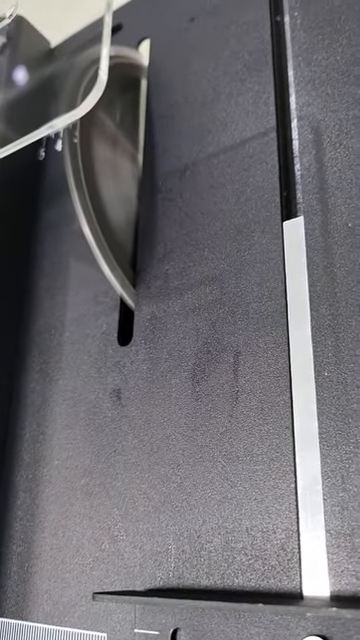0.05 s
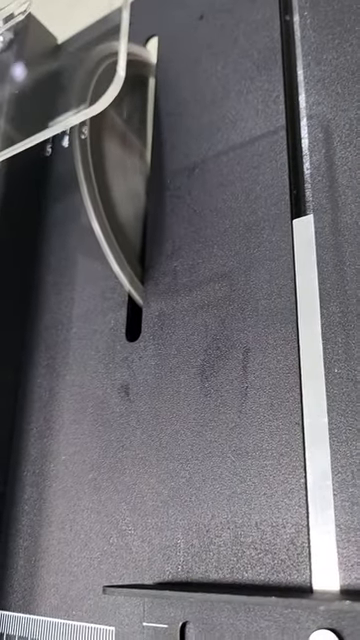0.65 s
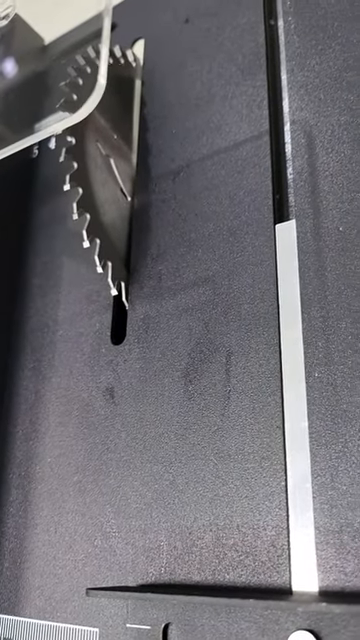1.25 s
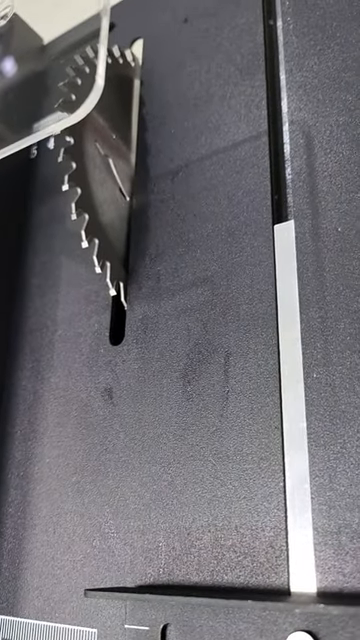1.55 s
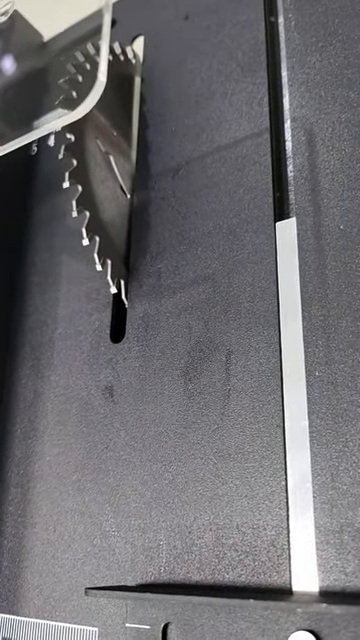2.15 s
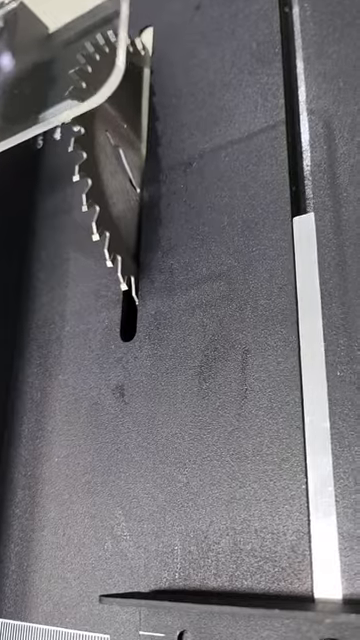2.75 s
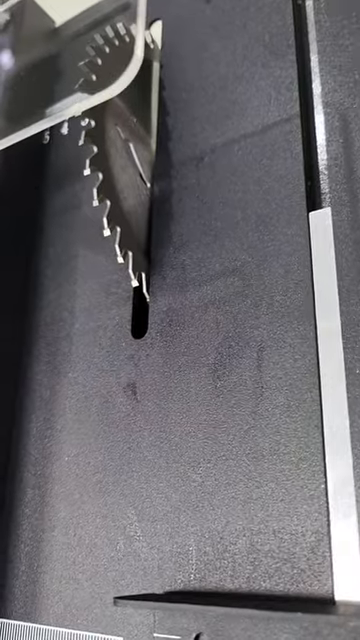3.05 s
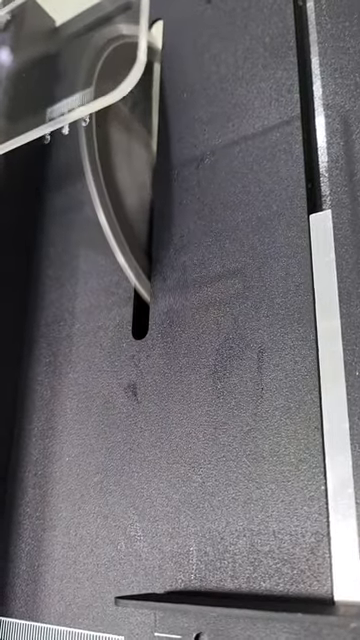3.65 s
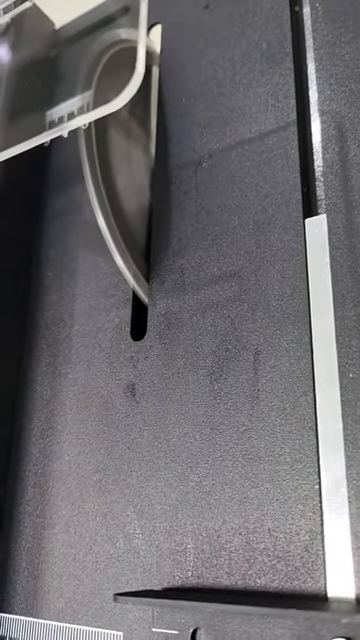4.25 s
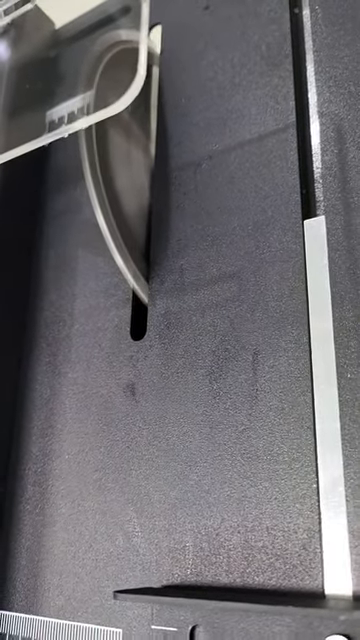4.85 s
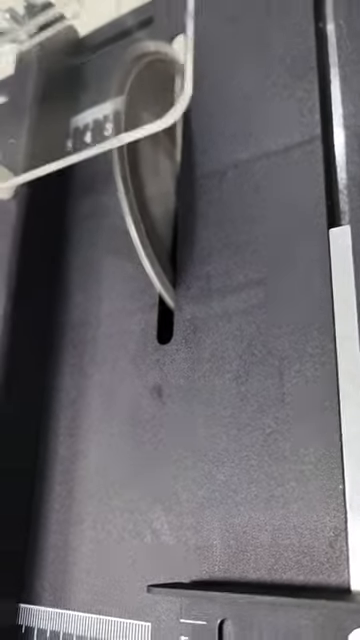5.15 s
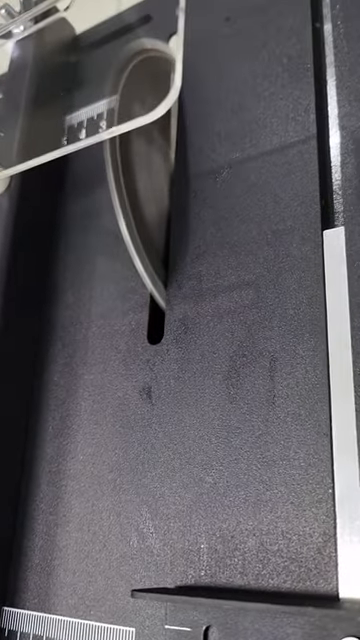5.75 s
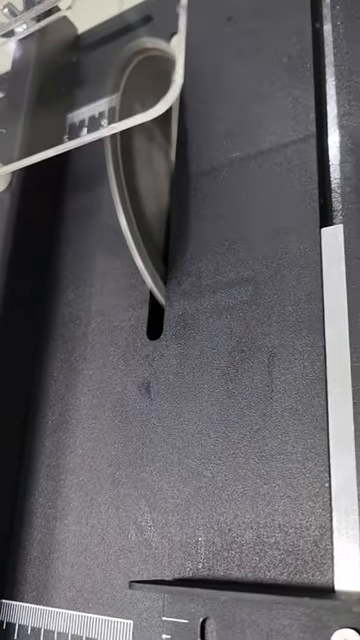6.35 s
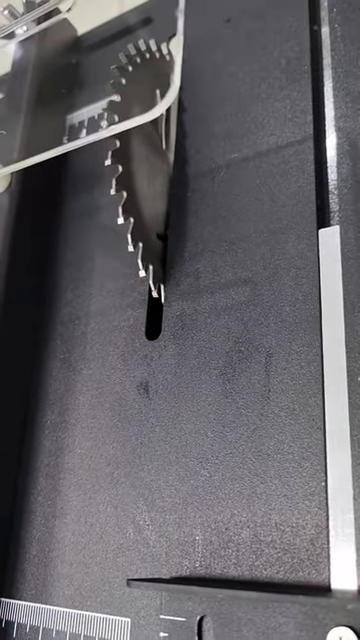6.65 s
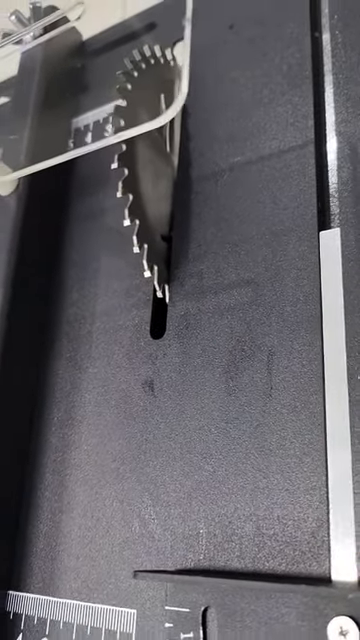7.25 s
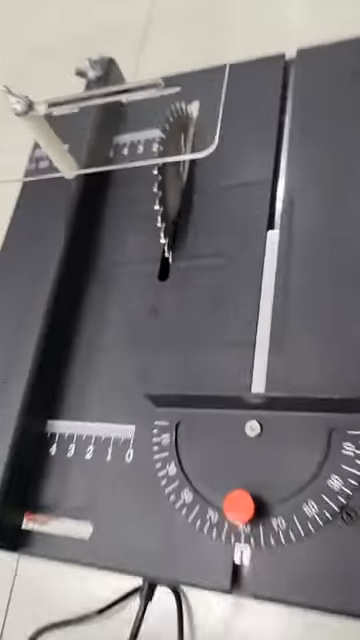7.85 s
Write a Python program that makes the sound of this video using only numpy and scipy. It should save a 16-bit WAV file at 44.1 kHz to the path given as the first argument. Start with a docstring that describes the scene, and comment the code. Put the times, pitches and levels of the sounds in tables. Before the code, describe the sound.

Close by and slightly right, a small table saw idles with a pulsing belt whine and rattle, until a rocker switch snaps and the pitch slides down to a stop. A low workshop hum and a few faint taps fill the gap. The switch clicks again, the housing knocks and the motor jumps back to speed. A last snap brings another falling whine, a faint blade ring and a soft rustle of cloth, with slight room echo.

```python
"""In a workshop, a small table saw runs idle, is switched off, coasts to rest, starts and stops again.
Its belt teeth whine on the pulley and throb with every lap of the belt, and the bearings rattle.
As the saw slows, the falling whine sweeps through the notes at which the housing likes to ring.
A rocker switch snaps and sparks, the housing knocks, and the blade rings on faintly after each stop.
A sleeve rustles at the end, and a low hum goes on throughout."""
import sys
import numpy as np
from scipy import signal
from scipy.fft import rfft, irfft, next_fast_len
from scipy.io import wavfile

SR = 44100
rng = np.random.default_rng(int(sys.argv[2]) if len(sys.argv) > 2 else 0)


def dump(signal):
    """Clip the signal to [-1, 1] and save it as 16-bit WAV at the path in sys.argv[1]."""
    limited = np.clip(np.atleast_2d(signal).T, -1, 1)
    pcm = np.round(limited * 32767).astype(np.int16)
    wavfile.write(sys.argv[1], SR, pcm)


N = 357651
TIME = np.arange(N) / SR
TURNS_PER_S, PULLEY_TEETH, BELT_TEETH = 53.83, 16, 175

# Levels are relative. Ring time is the time to fade by 60 dB. A larger tilt sounds brighter.
# motor runs: on t/s, off t/s, start of one belt lap t/s, whine level under load/dB
MOTOR_RUNS = [(-0.5, 0.812, .174, -2), (3.498, 6.507, 5.126, -0.5)]
# how tight the belt is along one lap: share of the lap, tension from -1 to 1
BELT_TENSION = [(.01, 1), (.13, .95), (.24, -.9), (.42, -.55), (.58, .3), (.71, -.95), (.86, -.45),
                (.93, .7)]
# tones of the whine: cycles per shaft turn, level/dB, left minus right/dB, swell per unit tension/dB
WHINE_TONES = [(8, -47, -6.5, 2), (15, -41.5, -8, -3.5), (16, -26.4, -6, 3.3), (32, -35.3, -10, 11),
               (33, -38.5, -9, 6.5), (48, -44, -9, 1.5), (17, -47, -10, 3), (18, -40, 2.5, 0.5),
               (19, -48, 3.5, 7), (20, -50, -4.5, 3), (30, -54, -8, 10), (31, -49, -3, 5),
               (34, -53, -15, 7), (42, -58, -0.5, 1), (45, -59, -9, 3), (57, -49, -11.5, -1),
               (58, -51.5, -5.5, 2), (46, -57, -5, 2), (47, -57, -6, 2), (49, -57, -6, 2), (50, -56, -5, 2),
               (56, -58, -6, 1), (80, -73, -2, 1), (87, -72, -2, 1), (91, -69, -2, 1), (99, -72, -2, 1),
               (100, -71, -2, 1), (112, -67, -1, 1), (118, -67, -1, 1), (119, -69, -1, 1)]
# tones that build up in the frame and so swell late: cycles per shaft turn
LATE_TONES = (16, 17, 18, 19, 20, 33, 34)
# the main tone dips as the teeth float free: t/s after power off, level/dB
TEETH_LET_GO = [(.008, -2), (.022, -15.5), (.04, -9), (.06, -2.5)]
# how well the frame passes on a tone: f/Hz, level/dB
FRAME_RESPONSE = [(110, -43), (175, -24.5), (260, -35.5), (350, -2), (385, -10), (415, -5.5), (480, -20.5),
                  (560, 3.5), (680, -6), (790, -19), (850, 1), (1100, 4.5), (1230, -5), (1360, 3.5),
                  (1500, -2.5), (1620, 1)]
# rattle of bearings, brushes and belt: f/Hz, level/dB
RATTLE_COLOUR = [(100, -12.5), (175, -8.5), (280, -22.5), (340, -5.5), (480, -14), (680, 0.5), (780, -21.5),
                 (1050, 7), (1200, -9), (2000, -9), (2600, -9), (3400, -17), (4300, -25), (6600, -24),
                 (8800, -37), (15000, -42)]
# notes at which the housing rings: f/Hz, width/Hz, level/dB
HOUSING_RINGS = [(329, 5.5, 7.5), (358.4, 22, 16.5), (405.9, 17, 23), (559.6, 21, 12.5), (655.7, 16, 11),
                 (1041, 24, 3), (179, 27, 14.5)]
# long rings of blade and table: f/Hz, ring time/s, level/dB
BLADE_RINGS = [(382, 3.0, -10), (829, 2.3, -9), (368, .6, 0), (414, .65, 2), (565, .6, -19), (1023, .8, -3),
               (1507, .5, -13), (1960, .4, -3)]
# notes of the loose panels: f/Hz, width/Hz, level/dB
PANEL_RINGS = [(665, 13, -0.5), (830, 17, -6.5), (1004, 18, 0), (1304, 46, -6)]
# a soft swell of noise just before each snap: t/s, level/dB, ring time/s, tilt/dB per octave
SNAP_LEAD_INS = [(.807, -18.5, 0.15, 4), (3.475, -24, .1, -1.5), (6.546, -22, 0.087, 1)]
# the switch snaps home and bounces: t/s, level/dB, ring time/s, tilt/dB per octave
SWITCH_SNAPS = [(.8228, -14.5, 0.045, -2), (.83, -24.5, .05, -2.5), (3.4855, -14.5, 0.012, 2),
                (3.489, -23.5, 0.18, 0), (6.5553, -16.5, 0.065, -1), (6.561, -14.5, .04, -1.5)]
# tone colour of the switch: f/Hz, level/dB
SNAP_COLOUR = [(150, -30), (260, -11), (350, 1), (550, -2.5), (800, 7), (1500, 3.5), (2500, 3.5),
               (3700, -1), (5000, -13), (6300, -10.5), (7800, -18.5), (11000, -29), (15000, -24.5)]
# notes of the panel around the switch: f/Hz, width/Hz, level/dB
SNAP_RINGS = [(1450, 290, -5.5), (1964, 83, -8.5), (2290, 180, -4), (2850, 240, -7.5), (4130, 770, -11)]
# a faint high hiss into the first snap, then three sparks: t/s, level/dB, ring time/s, tilt/dB per octave
HISS_AND_SPARKS = [(.81, -33, 0.21, 1.5), (.8228, -25, .07, 0.5), (3.4855, -33.5, 0.026, 3.5),
                   (6.554, -28, .1, -1)]
# tone colour of that hiss and the sparks: f/Hz, level/dB
HISS_AND_SPARK_COLOUR = [(1000, -39.5), (5000, -16.5), (6300, 8), (7600, -4), (11000, -6.5), (14800, 2.5)]
# the motor takes up or drops its load, or a hand bumps the housing: t/s, level/dB, top f/Hz
HOUSING_KNOCKS = [(.826, -22, 440), (2.6, -49.5, 400), (2.744, -50, 400), (3.511, -25, 800),
                  (3.5246, -13, 850), (3.535, -20.5, 800), (3.548, -23, 800), (3.56, -27.5, 800),
                  (3.573, -23.5, 800), (6.577, -25.5, 500)]
# notes of a knock: f/Hz, ring time/s, level/dB
KNOCK_RINGS = [(381, 0.087, -10), (425, .075, 0.5), (558, .1, -0.5), (675, 0.018, -3.5)]
# the blade comes to rest: t/s, level/dB of its ring
BLADE_STOPS = [(1.058, -56), (6.755, -47)]
# two close notes of the shuddering stand: f/Hz, ring time/s, level/dB
STAND_RINGS = [(378, .55, -28.5), (413, .55, -31)]
# faint taps of a hand: t/s, level/dB, ring time/s, tilt/dB per octave
HAND_TAPS = [(2.592, -62, .09, 0.5), (2.704, -58, 0.15, 2), (2.731, -57, .08, -0.5), (2.764, -55, .07, -3),
             (2.822, -64, 0.047, -1), (3.04, -52, .025, 2)]
# tone colour of a tap: f/Hz, level/dB
HAND_COLOUR = [(200, -8.5), (420, 14), (850, -5.5), (1300, 6.5), (1650, 6), (1950, -9), (2280, 4.5),
               (3000, -10.5), (4500, -23), (7000, -17), (9000, -38), (15000, -41.5)]
# loudness of the sleeve: t/s, level/dB
CLOTH_LEVEL = [(7.5, -78), (7.616, -59.5), (7.778, -51), (7.812, -62.5), (7.89, -63), (7.99, -61.5),
               (8.11, -54.5)]
# tone colour of the sleeve: f/Hz, level/dB
CLOTH_COLOUR = [(290, -17.5), (500, -13), (619, -16), (1370, -12.5), (2390, -13.5), (2800, -11.5),
                (4290, -23), (6030, -17.5), (8610, -34), (15000, -46)]
# bright notes of the casing: f/Hz, width/Hz, level/dB
CASING_RINGS = [(2350, 110, -10), (2620, 180, -4.5), (3020, 35, -2), (3400, 190, -5), (6060, 50, 8.5),
                (6330, 79, 4.5), (6900, 110, 1), (8720, 180, 3.5), (13200, 180, -3), (14750, 300, -3)]
# the saw stands to the right: f/Hz, left minus right level/dB
LEFT_LEVEL = [(120, 8.5), (400, -7), (700, -10), (1050, -4.5), (1700, -6.5), (3000, -2), (5000, -4),
              (7000, 0)]
# how far the wave on the left trails behind: f/Hz, lag/radians
LEFT_LAG = [(120, 1.7), (400, 0.97), (700, 1.5), (870, 0.69), (1000, 3.16), (1400, 3.6), (1750, 0.83),
            (2200, 4.1), (2800, 2.7), (3900, 1.66), (4700, 1.2), (6000, 0.23), (9000, 0.9)]
# how long the room echoes: f/Hz, ring time/s
ROOM_RING_TIME = [(200, 1), (450, 0.65), (1000, 0.68), (2000, .72), (3300, 0.75), (7000, 0.13),
                  (15000, 0.16)]
# how much of the small sounds spreads into the room: f/Hz, level/dB
SMALL_ECHO_COLOUR = [(1000, 0), (2000, 1), (2700, -1.5), (3700, -6.5), (6000, -2.5), (12000, -2)]
# tones of the steady hum: f/Hz, level/dB
HUM_TONES = [(58.6, -42), (121.8, -72), (125, -74), (242, -74), (414.5, -85)]
# room air and faint hiss: f/Hz, level/dB in a band 1 Hz wide
AIR_COLOUR = [(25, -84.5), (40, -86.5), (80, -85.5), (100, -83.5), (125, -85), (160, -96.5), (240, -101),
              (320, -103), (500, -107), (1000, -113), (2000, -120.5), (5000, -127), (6400, -124),
              (7000, -117), (8200, -134), (14000, -129)]


def saw(rattle_db=-37, rattle_growth=1.9, scatter_db=-12, bass_cut_hz=300):
    """Whine and rattle grow with speed and ring housing and blade. Returns the whole, and the rattle."""
    speed, pull, laps, whine_db = motor()
    turns, tension = shaft(speed, laps)
    tones = belt_whine(turns, speed, tension * speed ** 2, pull) * from_db(whine_db) * np.sqrt(speed)
    shake = from_db(rattle_db) * speed ** rattle_growth
    direct, scattered = (from_right(rattle(turns, tension) * shake) for _ in range(2))
    rattling = direct + from_db(scatter_db) * scattered * [[1], [-1]]
    drive = tones + band_filter(rattling, 5, bass_cut_hz, "high")   # a small body gives little bass
    housing = ring_through(drive, HOUSING_RINGS)
    blade = ring_through(drive, [(hz, np.log(1000) / np.pi / ring_s, db) for hz, ring_s, db in BLADE_RINGS])
    return drive + housing + blade + panel_buzz(housing[1]), rattling


def motor(spin_up_s=.024, coast_s=.41, brake_s=.065, seat_s=.125, slack_s=.034,
          judder_hz=85, judder_db=18, bed_in_db=2, bed_in_s=1.7):
    """The motor speeds up fast and friction stops it. Returns speed, belt pull, laps and whine level."""
    speed, pull, laps, level_db = np.zeros((4, N))
    for on, off, lap_start, load_db in MOTOR_RUNS:
        now = TIME >= on
        age, coasting = np.maximum(TIME - on, 0), np.maximum(TIME - off, 0)
        braking = np.minimum(coasting / brake_s, 1) ** 2   # takes hold gradually
        run_speed = (1 - np.exp(-age / spin_up_s)) * np.maximum(1 - braking * coasting / coast_s, 0)
        seated = np.minimum(age / seat_s, 1)
        taut = np.clip(2 - coasting / slack_s, 0, 1)
        # the motor judders until the belt is seated; the whine then grows as the belt beds in
        judder_dip_db = judder_db * (1 - seated) * np.cos(np.pi * judder_hz * age) ** 2
        bedding_dip_db = bed_in_db * np.maximum(1 - age / bed_in_s, 0)
        travel = np.cumsum(run_speed) * TURNS_PER_S / SR * PULLEY_TEETH / BELT_TEETH
        speed[now] = run_speed[now]
        pull[now] = (seated * taut)[now] ** 2
        laps[now] = travel[now] - np.interp(lap_start, TIME, travel)
        level_db[now] = load_db * pull[now] - (judder_dip_db + bedding_dip_db)[now]
    return speed, pull, laps, level_db


def shaft(speed, laps, lap_scatter=.09):
    """The uneven belt sways the speed, never twice alike. Returns shaft turns and belt tension."""
    tension = np.interp(laps, *np.transpose(BELT_TENSION), period=1) + lap_scatter * drift(10)
    sway = .005 * (tension - tension[speed > .5].mean()) + .0008 * drift(25)
    return np.cumsum(speed * (1 + sway)) * TURNS_PER_S / SR, tension


def belt_whine(turns, speed, tension, pull, slack_db=-9, overtone_slack_db=-4, loose_flutter=.6):
    """Belt teeth meet the pulley 16 times a turn; its wobble adds side tones that fade on a slack belt."""
    out = np.zeros((2, N))
    late_tension = np.array([depth * np.interp(TIME - lag_s, TIME, tension)
                             for lag_s, depth in [(.029, 1.2), (.019, .9)]])   # left, right
    let_go_db = sum(np.interp(TIME - off, *np.transpose(TEETH_LET_GO), left=0, right=0)
                    for _, off, _, _ in MOTOR_RUNS)
    for cycles, level_db, left_db, tension_db in WHINE_TONES:
        is_main = cycles == PULLEY_TEETH
        unsteady = 1 if is_main else np.clip(cycles / 11, 2, 4.5)
        phase = 2 * np.pi * (cycles * turns + rng.random()) + .07 * unsteady * drift(35)
        flutter_db = .6 * unsteady * drift(35)
        if abs(cycles - 2 * PULLEY_TEETH) <= 2:   # the first overtone and its neighbours
            phase -= tension   # their pitch bends with each swell
            flutter_db *= 1 - loose_flutter * tension   # they flutter most on a loose belt
        swell_db = tension_db * (late_tension if cycles in LATE_TONES else tension)
        if is_main:
            load_db = let_go_db
        else:
            load_db = (1 - pull) * (slack_db if cycles % PULLEY_TEETH else overtone_slack_db)
        frame_db = at_hz(FRAME_RESPONSE, cycles * speed * TURNS_PER_S)
        gain = from_db(level_db + swell_db + flutter_db + load_db + frame_db)
        out += np.sqrt(2) * np.sin(phase) * gain * from_db([[left_db], [0]])
    flap_db = 1.5 * (1.5 - pull) * drift(60)   # a slack belt flaps more
    return out * from_db(flap_db)


def rattle(turns, tension, repeating=.24, pulsing=.087, tension_db=1.0, bumps=280):
    """Rough surfaces repeat one pattern every turn, while fresh rubbing noise pulses with the shaft."""
    surface = np.interp(turns * bumps, np.arange(bumps), rng.standard_normal(bumps), period=bumps)
    friction = rng.standard_normal(N) * (1 + pulsing * np.cos(2 * np.pi * turns))
    return coloured(repeating * surface + friction, RATTLE_COLOUR) * from_db(tension_db * tension)


def panel_buzz(swing, gap=.043, top_hz=1450):
    """Loose panels chatter dully whenever the housing swings far enough to close the gap to them."""
    contact = np.maximum(np.abs(swing) - gap, 0) * rng.standard_normal(N)
    contact = band_filter(contact, 6, top_hz)
    return from_right(ring_through(contact, PANEL_RINGS, boost_db=9.5))


def switch(level_db=-3):
    """A soft swell of noise leads into each snap of the rocker, which sets its panel ringing."""
    lead_ins = blows(SNAP_LEAD_INS, SNAP_COLOUR, crack_db=-13.5, crack_s=.014, rise_s=.009)
    snaps = blows(SWITCH_SNAPS, SNAP_COLOUR, crack_db=0, crack_s=.002, rise_s=.0003)
    clicks = (lead_ins + snaps) * from_db(level_db)
    return clicks + ring_through(clicks, SNAP_RINGS, boost_db=8)


def hiss_and_sparks():
    """A faint high hiss leads into the first snap; the contacts spark as they open and close."""
    return blows(HISS_AND_SPARKS, HISS_AND_SPARK_COLOUR, crack_db=0, crack_s=.002, rise_s=.0007)


def knocks(bass_cut_hz=310, samples=8192):
    """Each knock rings the low notes of the housing; a softer contact sounds duller."""
    out = np.zeros(N)
    ring = band_filter(fading_notes(KNOCK_RINGS, np.arange(samples) / SR), 6, bass_cut_hz, "high")
    for t, level_db, top_hz in HOUSING_KNOCKS:
        start = int(t * SR)
        out[start:start + samples] += from_db(level_db) * band_filter(ring, 4, top_hz)
    return out


def singing_blade(shudder_rise_s=.03):
    """At each stop the stand shudders briefly, and the blade's longest note rings on after it."""
    hz, ring_s, _ = BLADE_RINGS[0]
    out = np.zeros(N)
    for t, level_db in BLADE_STOPS:
        age = np.maximum(TIME - t, 0)
        out += fading_notes(STAND_RINGS, age) * (1 - np.exp(-age / shudder_rise_s))
        out += fading_notes([(hz, ring_s, level_db)], age)
    return out


def taps():
    """A hand makes faint, soft taps while the saw is at rest."""
    return blows(HAND_TAPS, HAND_COLOUR, crack_db=-6, crack_s=.003, rise_s=.003)


def sleeve():
    """Cloth slides in small uneven catches."""
    level_db = np.interp(TIME, *np.transpose(CLOTH_LEVEL))
    cloth = coloured(rng.standard_normal((2, N)), CLOTH_COLOUR)
    catches_db = drift(40.4)
    return cloth * from_db(level_db + catches_db) * (TIME > CLOTH_LEVEL[0][0])


def casing(sound, panel_db=-3, fade_s=.012, apart_db=2, samples=3000):
    """The casing adds its bright notes and a short, dense panel ring that differs on each side."""
    age = np.arange(samples) / SR
    noise = rng.standard_normal(samples) + from_db(apart_db) * rng.standard_normal((2, samples))
    panel = unit_power(noise * np.exp(-age / fade_s)) / np.sqrt(samples)
    panel = band_filter(panel, 2, 2500, "high")
    panel_ring = signal.fftconvolve(sound[None], panel, axes=1)[:, :N]
    return sound + ring_through(sound, CASING_RINGS) + from_db(panel_db) * panel_ring


def from_right(sound):
    """Sound leaves through the casing; the left side is shaded, except in the bass."""
    left, right = casing(sound)
    return np.array([shaped(left, LEFT_LEVEL), right])


def room_echo(sound, rise_s=.0014, samples=40000):
    """The workshop's echoes blur together, differ on each side and die soonest in the treble."""
    age, tail = np.arange(samples) / SR, 0
    edges_hz = np.geomspace(100, 16000, 9)
    for low, high in zip(edges_hz, edges_hz[1:]):
        band = band_filter(rng.standard_normal((2, samples)), 2, [low, high], "band")
        tail += band * from_db(-60 * age / at_hz(ROOM_RING_TIME, np.sqrt(low * high)))
    tail = unit_power(tail * (1 - np.exp(-age / rise_s))) / np.sqrt(samples)
    return signal.fftconvolve(sound[None], tail, axes=1)[:, :N]


def hum():
    """A low hum, alike on both sides, barely wavers."""
    out = np.zeros(N)
    for hz, level_db in HUM_TONES:
        gain = np.sqrt(2) * from_db(level_db + .25 * drift(4))
        out += gain * np.sin(2 * np.pi * hz * (TIME + .0001 * drift(3)))
    return out


def room_air(side_db=-6):
    """The air of the room is a quiet rush, a little different on each side."""
    air = rng.standard_normal(N) + from_db(side_db) * rng.standard_normal(N) * [[1], [-1]]
    return shaped(air * np.sqrt(SR / 2), AIR_COLOUR)


def blows(rows, colour, crack_db, crack_s, rise_s, samples=16384):
    """Bursts of noise, each a crack and a short ring; a slower rise sounds softer."""
    out, age = np.zeros(N + samples), np.arange(samples) / SR
    for t, level_db, ring_s, tilt_db in rows:
        fade = from_db(-60 * age / ring_s) + from_db(crack_db) * np.exp(-age / crack_s)
        rise = 1 - np.exp(-age / rise_s)
        tilted = [(hz, db + tilt_db * np.log2(hz)) for hz, db in colour]
        noise = coloured(rng.standard_normal(samples), tilted)
        start = int(t * SR)
        out[start:start + samples] += from_db(level_db) * rise * fade * noise
    return out[:N]


def fading_notes(notes, age):
    """Pure tones that each die away over their own ring time."""
    return sum(from_db(db - 60 * age / ring_s) * np.sin(2 * np.pi * hz * age) for hz, ring_s, db in notes)


def ring_through(sound, rings, boost_db=0):
    """A body rings along with a sound at its own notes; narrower notes ring longer."""
    out = 0
    for hz, width, db in rings:
        r = np.exp(-np.pi * width / SR)
        feed = np.array([1, 0, -1]) * (1 - r * r) / 2
        feedback = [1, -2 * r * np.cos(2 * np.pi * hz / SR), r * r]
        out += from_db(db + boost_db) * signal.lfilter(feed, feedback, sound + 1e-18)
    return out


def drift(rate_hz, step=40):
    """A smooth random wander, about 1 in size."""
    r = np.exp(-2 * np.pi * step * rate_hz / SR)
    slow = signal.lfilter([1], [1, -2 * r, r * r], rng.standard_normal(N // step + 2002))[2000:]
    return np.interp(np.arange(N) / step, np.arange(len(slow)), unit_power(slow))


def band_filter(sound, steepness, hz, keep="low"):
    """Keep the lows, the highs or a band between."""
    return signal.sosfilt(signal.butter(steepness, hz, keep, fs=SR, output="sos"), sound)


def from_db(db):
    """Turn decibels into a gain."""
    return 10 ** (np.asarray(db) / 20)


def unit_power(sound):
    """Scale to an average power of 1."""
    return sound / np.sqrt(np.mean(sound ** 2) + 1e-20)


def at_hz(curve, hz):
    """Read a curve between its points, with octaves evenly spaced."""
    f, value = np.transpose(curve)
    return np.interp(np.log(np.maximum(hz, 1)), np.log(f), value)


def shaped(sound, curve, to_gain=from_db):
    """Filter a sound by a curve over frequency, read as decibels by default."""
    size = next_fast_len(sound.shape[-1] + 4096)
    gain = to_gain(at_hz(curve, np.fft.rfftfreq(size, 1 / SR)))
    return irfft(rfft(sound, size) * gain, size)[..., :sound.shape[-1]]


def coloured(noise, colour):
    """Give noise a tone colour and a power of 1."""
    return unit_power(shaped(noise, colour))


def scene(saw_echo_db=-22, rattle_echo_db=-23, small_echo_db=-15):
    """The saw stands to the right; its rattle spreads into the room more than its whine does."""
    machine, rattling = saw()
    clicks = band_filter(switch() + hiss_and_sparks() + taps(), 3, 300, "high")
    small_sounds = from_right(clicks + knocks() + singing_blade())
    left, right = machine + small_sounds
    left = shaped(left, LEFT_LAG, to_gain=lambda lag: np.exp(-1j * lag))
    into_room = from_db(saw_echo_db) * machine[1] + from_db(rattle_echo_db) * rattling[1]
    into_room += from_db(small_echo_db) * shaped(small_sounds[1], SMALL_ECHO_COLOUR)
    return np.array([left, right]) + room_echo(into_room) + sleeve() + hum() + room_air()


def record(dry, top_hz=15400):
    """The highest treble is cut off steeply."""
    return signal.sosfilt(signal.ellip(10, .2, 80, top_hz, fs=SR, output="sos"), dry)


dry = scene()
out = record(dry)
dump(out)
```